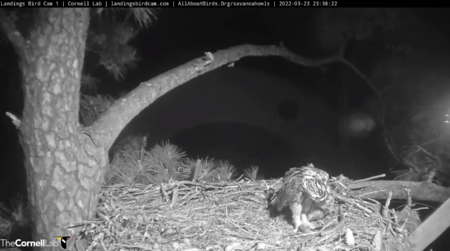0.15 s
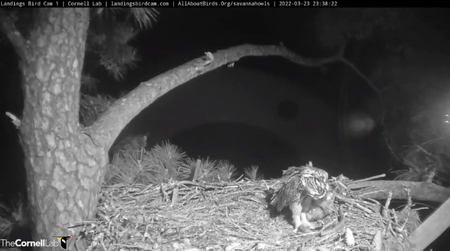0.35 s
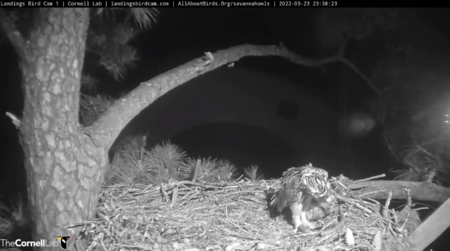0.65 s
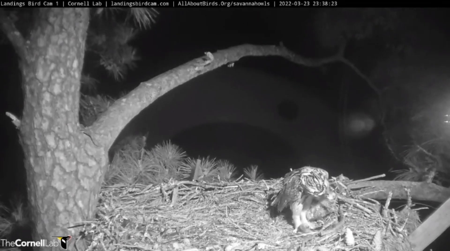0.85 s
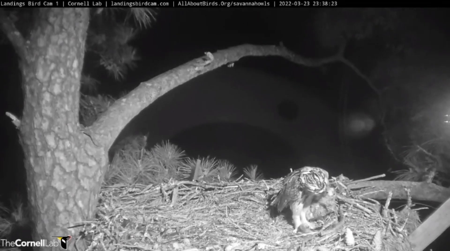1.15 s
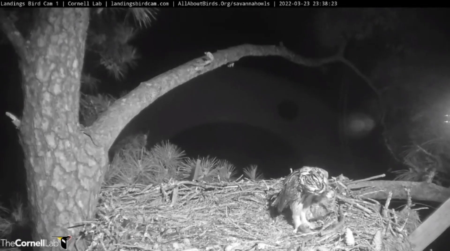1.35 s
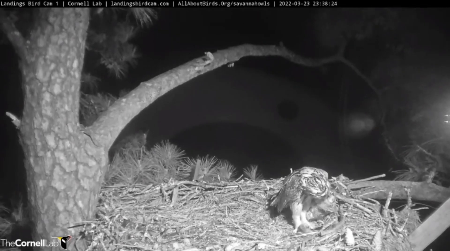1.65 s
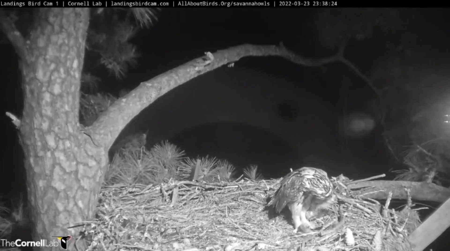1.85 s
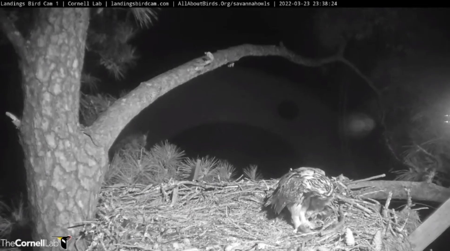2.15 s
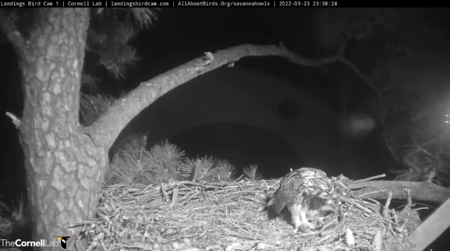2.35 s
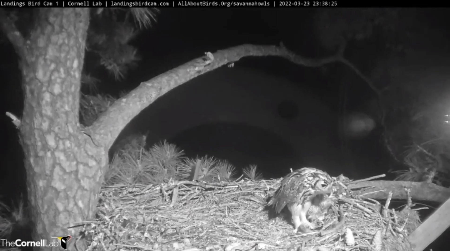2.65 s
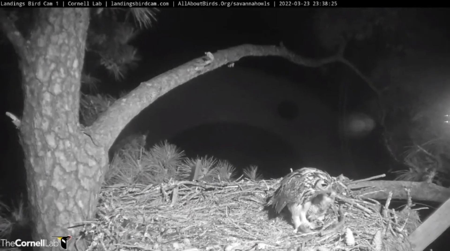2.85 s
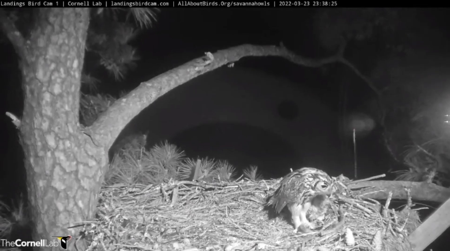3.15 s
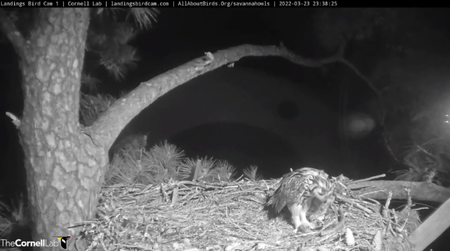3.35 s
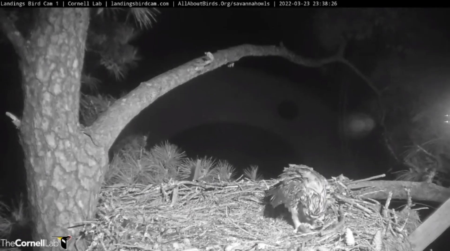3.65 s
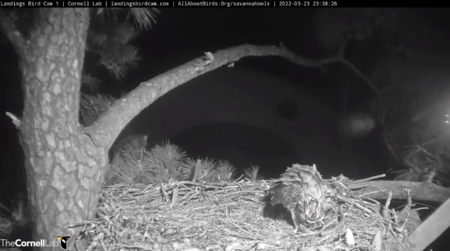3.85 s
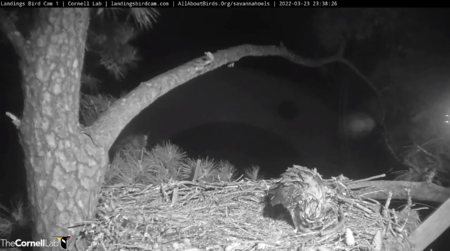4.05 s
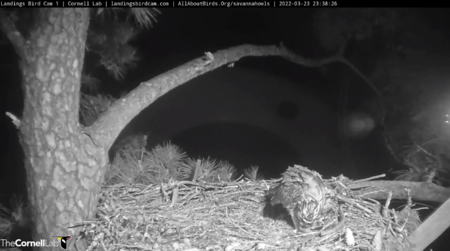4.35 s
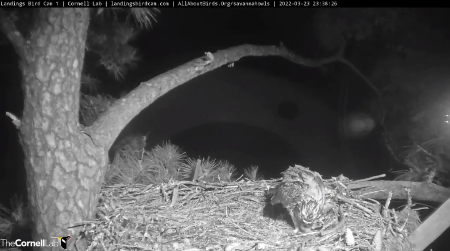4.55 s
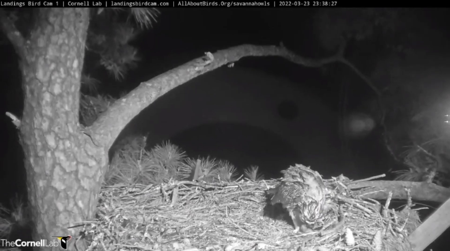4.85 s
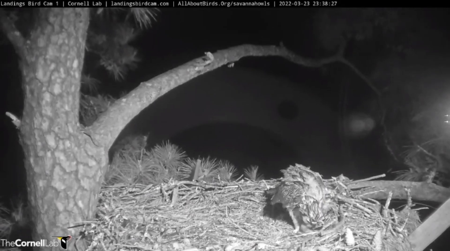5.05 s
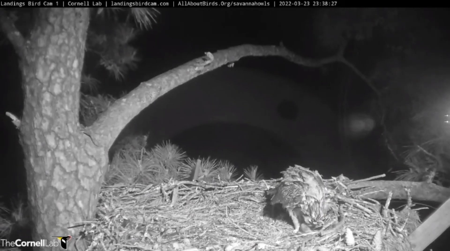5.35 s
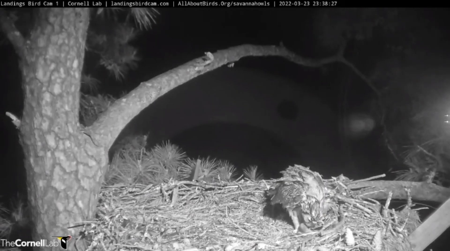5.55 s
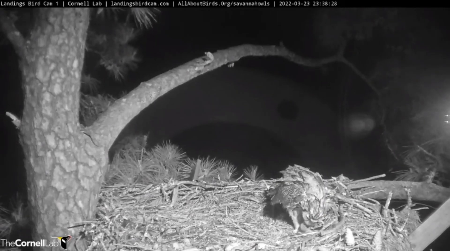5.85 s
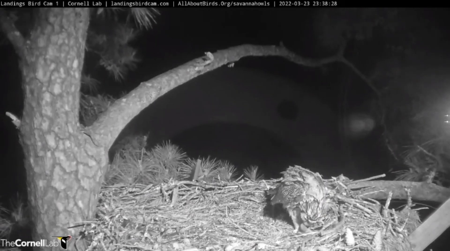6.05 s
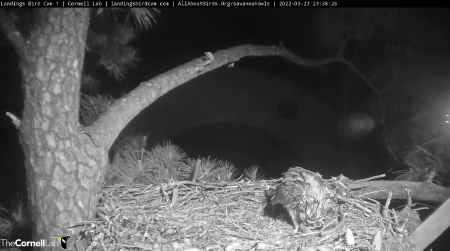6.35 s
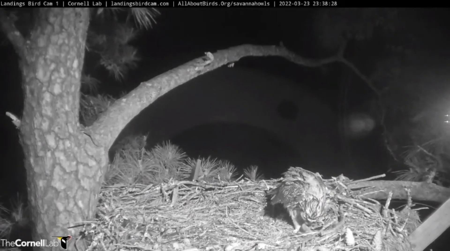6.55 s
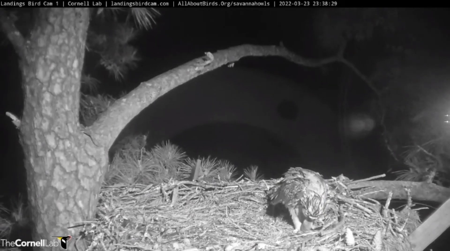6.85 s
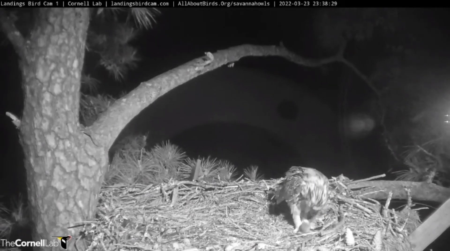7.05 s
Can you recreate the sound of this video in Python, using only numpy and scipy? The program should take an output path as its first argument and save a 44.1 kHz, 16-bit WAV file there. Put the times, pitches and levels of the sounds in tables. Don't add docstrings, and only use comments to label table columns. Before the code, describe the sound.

A microphone beside a tree nest picks up constant deep, uneven wind rumble with dull buffeting gusts. Behind it, a far night hiss and high steady whine pump up and down, with two very faint distant peeps early on. Light twig clicks are scattered throughout. Midway, one young owl utters a short, rough, piercing whistle that ends in a quick downward slide; afterwards only wind, hiss and sharper ticks remain.

```python
import sys
import numpy as np
from scipy import signal
from scipy.fft import rfft, irfft
from scipy.io import wavfile
from scipy.ndimage import uniform_filter1d

SR = 44100
rng = np.random.default_rng(int(sys.argv[2]) if len(sys.argv) > 2 else 0)


def master_out(mix):
    frames = np.transpose(np.atleast_2d(mix))
    ceiling = np.clip(frames, -1, 1)
    pcm = np.round(ceiling * 32767).astype(np.int16)
    wavfile.write(sys.argv[1], SR, pcm)


def gain_from_db(level_db):
    decades = np.asarray(level_db, float) / 20
    return 10 ** decades


N = 317520

# t/s, pressure level/dB, share of large slow eddies/dB,
# turbulence level between gusts/dB
WIND_COURSE = [(0, -38, -8, -54.5), (.3, -35, -17.5, -54), (.6, -34.5, -14, -49.5), (1.45, -34, -14, -51),
               (1.77, -40, -6.5, -56.5), (1.97, -34.5, -9, -54.5), (2.1, -38.5, -5, -56),
               (2.58, -39, -5, -61), (2.91, -48.5, -4, -57.5), (2.98, -37, 0, -56.5),
               (3.12, -40, -2.5, -59.5), (3.3, -36, -8.5, -55), (3.9, -38, -11.5, -56.5),
               (4.45, -35.5, -7, -55.5), (4.75, -37, 0.5, -52), (5.0, -35, -6, -51.5),
               (5.8, -35.5, -3, -52), (7.2, -38.5, -5, -60.5)]
# middle t/s, length/s, strength/dB, whistle over the housing/dB
GUSTS = [(0.39, 0.091, 6.5, 6), (.62, 0.3, 1, 1), (0.8, 0.39, 0, 2.5), (1.09, 0.19, 4.5, 7),
         (1.365, .11, -0.5, 6), (1.567, 0.11, 4.5, 3.5), (1.898, 0.21, 5.5, 4.5), (2.22, 0.19, 6.5, 4.5),
         (2.469, 0.072, 6.5, -0.5), (2.568, 0.03, 12, -6), (3.003, 0.096, 9, 4.5), (3.267, 0.18, 6, 6),
         (3.415, 0.12, 6.5, 7), (3.597, 0.056, 11.5, 8), (3.705, 0.16, 8, 5.5), (3.962, 0.054, 1, 4),
         (4.122, 0.12, 4.5, 6), (4.36, 0.41, 4.5, 3), (4.678, 0.047, 1.5, 5), (4.906, 0.13, 0.5, 3),
         (5.246, 0.12, 0.5, 2.5), (5.515, 0.33, 1, 1), (5.8, 0.29, 3, 1.5), (5.98, 0.11, -1.5, -1),
         (6.308, 0.27, 4, 2.5), (6.494, 0.04, 5, 5), (6.829, 0.11, 5, 5.5), (6.929, 0.069, 10.5, 5),
         (7.159, 0.2, 4.5, 6.5)]
# f/Hz, density/dB per Hz
RUMBLE_SPECTRUM = [(12, -67), (20, -40), (83, -0.5), (107, 3.5), (137, 0.5), (199, -19), (260, -24.5),
                   (340, -43.5), (570, -120)]
# f/Hz, density/dB per Hz
BUFFET_SPECTRUM = [(110, -25), (180, -2.5), (200, -4), (275, -2.5), (486, -15.5), (850, -18), (1250, -32.5),
                   (1800, -35)]
# t/s, far level after it/dB, level it may climb back to/dB
GAIN_CLAMPS = [(0, -70.5, -59), (.416, -69, -65), (.56, -68.5, -62.5), (.735, -68, -65),
               (1.336, -66.5, -63.5), (1.541, -65, -58.5), (1.864, -60, -58.5), (1.942, -68, -62.5),
               (2.224, -65, -62), (2.5, -65, -59), (2.76, -59, -58.5), (3.245, -65.5, -63),
               (3.456, -66.5, -64), (3.76, -69, -69), (4.066, -71.5, -63), (4.447, -65, -62),
               (4.683, -64, -55), (4.93, -64, -61.5), (5.3, -65.5, -62.5), (5.83, -65.5, -57.5),
               (6.195, -60.5, -56), (6.333, -64, -57.5), (6.92, -52, -60), (7.0, -60.5, -56.5)]
# f/Hz, density/dB per Hz
HISS_SPECTRUM = [(1300, -12), (1750, -14.5), (2300, -11), (2550, -7.5), (2800, -3), (3200, -1), (3700, -5),
                 (4300, -8), (4850, -6), (5400, -11.5), (6400, -13.5), (7000, -16.5), (7600, -29.5),
                 (8200, -46)]
# f/Hz, level above the hiss/dB
WHINE_LINES = [
    (2360, -15),
    (2832, -6.5),
    (3305, -16),
]
# t/s, length/s, f/Hz, level/dB
FAR_PEEPS = [
    (.245, .135, 2900, -62),
    (2.125, .11, 2905, -60),
]
# t/s, peak level/dB, f/Hz, bandwidth/Hz
TWIG_TICKS = [(.798, -52, 3500, 2480), (0.866, -44.5, 2930, 2000), (1.045, -53, 5200, 2030),
              (1.316, -45, 4600, 1500), (1.777, -44, 3500, 1970), (2.752, -55, 3200, 900),
              (3.317, -48.5, 4000, 2000), (3.436, -41, 3970, 2200), (3.5, -52, 4000, 3000),
              (3.619, -44, 5770, 3500), (3.751, -49, 5600, 2500), (3.975, -60, 6770, 1770),
              (4.25, -49.5, 4380, 1497), (4.893, -40, 3350, 2500), (6.311, -34, 2880, 1390),
              (6.311, -52.5, 5470, 2600), (6.86, -43, 5030, 1500), (7.1, -46.5, 4500, 2000),
              (7.17, -42, 3480, 1200)]
# t/s, f/Hz, level/dB
MAIN_VOICE = [
    (3.67, 1900, -68),
    (3.704, 3110, -44.5),
    (3.729, 3340, -50),
    (3.755, 3040, -47.5),
    (3.89, 3070, -44.5),
    (4.019, 3010, -48),
    (4.045, 2660, -53),
    (4.067, 1880, -61),
    (4.085, 1605, -80),
]
# t/s, f/Hz, level/dB
SECOND_VOICE = [
    (3.695, 3200, -62),
    (3.712, 3710, -50),
    (3.79, 3640, -50.5),
    (3.9, 3470, -50.5),
    (4.015, 3230, -53),
    (4.03, 3120, -64),
]
# t/s, level/dB
UPPER_VOICE = [
    (3.74, -66),
    (3.77, -54),
    (3.85, -51),
    (4.04, -57),
    (4.065, -70),
]
# t/s, pitch step/Hz, level step/dB
BREATH_PUSHES = [
    (3.796, 86, 2.4),
    (3.874, 101, 0.99),
]


def rms_one(x):
    return x / np.sqrt(np.mean(x ** 2) + 1e-20)


def in_time(rows):
    s, *columns = np.transpose(rows)
    return [np.interp(np.arange(N) / SR, s, c) for c in columns]


def drift(rate_hz):
    r = np.exp(-20 * np.pi * rate_hz / SR)
    noise = rng.standard_normal(N // 10 + 4002)
    slow = signal.lfilter([1], [1, -2 * r, r * r], noise)[4000:]
    return np.interp(np.arange(N) / 10, np.arange(len(slow)), rms_one(slow))


def coloured(spectrum):
    hz, level_db = np.transpose(spectrum)
    octave = np.log2(np.arange(N // 2 + 1) * SR / N + 1)
    below = np.maximum(np.log2(hz[0]) - octave, 0)
    above = np.maximum(octave - np.log2(hz[-1]), 0)
    shape = gain_from_db(np.interp(octave, np.log2(hz), level_db) - 120 * (below + above))
    return rms_one(irfft(rfft(rng.standard_normal(N)) * shape, N))


def resonance(x, hz, width_hz):
    r = np.exp(-np.pi * width_hz / SR)
    zeros = (1 - r * r) / 2 * np.array([1, 0, -1])
    poles = [1, -2 * r * np.cos(2 * np.pi * hz / SR), r * r]
    return signal.lfilter(zeros, poles, x)


def window(start, stop, fade):
    return np.interp(np.arange(N) / SR, [start, start + fade, stop - fade, stop], [0, 1, 1, 0])


def bump(centre, length):
    return np.maximum(1 - 2 * np.abs(np.arange(N) / SR - centre) / length, 0)


def wind_levels():
    calm_db, ring_below_db, ring_follows, gust_push = -54.5, -9, 0.68, 0.26
    pressure_db, share_db, turbulence_db = in_time(WIND_COURSE)
    gust_db, whistle_db = np.zeros((2, N))
    for s, length, strength_db, over_housing_db in GUSTS:
        blunt = np.minimum(1.8 * bump(s, length), 1)
        gust_db += strength_db * blunt
        whistle_db += over_housing_db * blunt
    share = np.clip(gain_from_db(2 * (share_db + 0.5 * drift(2.7))), .01, .85)
    rumble_db = pressure_db + gust_push * gust_db + 10 * np.log10(1 - share)
    deep_db = 10 * np.log10(share / (1 - share))
    ring_db = calm_db + ring_below_db + ring_follows * (turbulence_db - calm_db) + whistle_db
    return rumble_db, deep_db, turbulence_db + gust_db, ring_db


def wind():
    squeeze, split_hz, eddy_db = 0.37, 95, 2.0
    ring_hz, ring_width_hz = 1010, 150
    rumble_db, deep_db, buffet_db, ring_db = wind_levels()
    air = coloured(RUMBLE_SPECTRUM)
    air = air / np.sqrt(uniform_filter1d(air ** 2, size=600) + 0.04) ** squeeze
    low_pass = signal.butter(2, split_hz, "low", fs=SR, output="sos")
    high_pass = signal.butter(2, split_hz, "high", fs=SR, output="sos")
    deep = rms_one(signal.sosfiltfilt(low_pass, air))
    throb = rms_one(signal.sosfiltfilt(high_pass, air))
    rumble = gain_from_db(rumble_db - 1.96) * (throb + gain_from_db(deep_db) * deep)

    eddies = drift(45)
    buffet = rms_one(coloured(BUFFET_SPECTRUM) * gain_from_db(eddy_db * eddies))
    shaken = rng.standard_normal(N) * gain_from_db(eddy_db * (1.1 * eddies + 0.28 * drift(30)))
    ring = resonance(shaken, ring_hz, ring_width_hz)
    ring = rms_one(resonance(ring, ring_hz, 1.6 * ring_width_hz))
    return rumble + gain_from_db(buffet_db) * buffet + gain_from_db(ring_db) * ring


def gain_control():
    recover_db_per_s, clamp_s = 26, .025
    s, low_db, top_db = np.transpose(GAIN_CLAMPS)
    t = np.arange(N) / SR
    last = np.maximum(np.searchsorted(s, t, "right") - 1, 0)
    level_db = np.minimum(low_db[last] + recover_db_per_s * (t - s[last]), top_db[last])
    return uniform_filter1d(level_db, size=int(clamp_s * SR), mode="nearest")


def electrical_whine():
    cycles_per_hz = np.cumsum(1 + .0005 * drift(4)) / SR
    whine = np.zeros(N)
    for hz, db in WHINE_LINES:
        whine += gain_from_db(db + drift(13)) * np.sqrt(2) * np.sin(2 * np.pi * hz * cycles_per_hz)
    return whine


def hollow_band():
    hollow = rng.standard_normal(N)
    for stage in range(3):
        hollow = resonance(hollow, 2043, 404)
    return gain_from_db(-6 + 1.06 * drift(4.6) + 2.0) * rms_one(hollow)


def peep(start, length, hz, level_db):
    swell = window(start, start + length, .2 * length)
    phase = 2 * np.pi * np.cumsum(hz * (.99 + .01 * swell)) / SR
    return gain_from_db(level_db) * swell * np.sin(phase)


def night():
    far = gain_from_db(0.5) * coloured(HISS_SPECTRUM) + hollow_band() + electrical_whine()
    peeps = sum(peep(*row) for row in FAR_PEEPS)
    return gain_from_db(gain_control() + 1.17 * drift(54)) * far + peeps


def twigs():
    decay_s, length = 0.0015, 400
    out = np.zeros(N)
    decay = np.exp(-np.arange(length) / (decay_s * SR))
    for s, peak_db, hz, width_hz in TWIG_TICKS:
        burst = rng.standard_normal(length) * decay
        tick = resonance(resonance(burst, hz, width_hz), hz, width_hz)
        at = round(s * SR)
        out[at:at + length] += gain_from_db(peak_db) * tick / np.abs(tick).max()
    return out


def breath_pushes():
    rise_s = 0.011
    t = np.arange(N) / SR
    step_hz, step_db = np.zeros((2, N))
    for s, hz, db in BREATH_PUSHES:
        rise = np.clip((t - s) / rise_s + .5, 0, 1)
        step_hz += hz * rise
        step_db += db * rise
    return step_hz, step_db


def membrane(hz, rows, jitter, shimmer_db):
    level_db = in_time(rows)[-1]
    phase = 2 * np.pi * np.cumsum(hz * (1 + jitter * drift(220))) / SR
    gate = window(rows[0][0], rows[-1][0], .006)
    return phase, np.sqrt(2) * gate * gain_from_db(level_db + shimmer_db * drift(250))


def rasp(phase, spread_hz):
    low_pass = signal.butter(3, spread_hz, fs=SR, output="sos")
    flutter = signal.sosfilt(low_pass, rng.standard_normal((2, N)))
    return rms_one(flutter[0] * np.sin(phase) + flutter[1] * np.cos(phase))


def owlet():
    step_hz, step_db = breath_pushes()
    pitch_hz = in_time(MAIN_VOICE)[0] + step_hz
    second_hz = in_time(SECOND_VOICE)[0] + 1.5 * step_hz
    held = np.clip(pitch_hz / 200 - 14.4, 0, 1)
    main, height = membrane(pitch_hz, MAIN_VOICE, jitter=.012, shimmer_db=2.0)
    height = height * gain_from_db(step_db - 8 * bump(3.715, 0.016))
    second, second_height = membrane(second_hz, SECOND_VOICE, jitter=.013, shimmer_db=2.3)
    upper, upper_height = membrane(pitch_hz + 1030, UPPER_VOICE, jitter=.014, shimmer_db=2.6)
    upper_height = upper_height * gain_from_db(-4)
    lines = height * np.sin(main) + second_height * np.sin(second) + upper_height * np.sin(upper)

    effort = uniform_filter1d(height, size=600)
    hoarse = effort * (gain_from_db(-18.0) * rasp(1.06 * main, 300) + gain_from_db(-21.5) * rasp(.8 * main, 600))
    hoarse += gain_from_db(-9) * second_height * rasp(second, 250)
    hoarse += gain_from_db(-8) * upper_height * rasp(1.03 * upper, 300)

    strain = np.abs(effort / effort.max()) ** 1.3
    overtone = gain_from_db(-22) * height * strain * held * (np.sin(2 * main) + 0.36 * rasp(2 * main, 200))

    sums = second_height * rasp(main + second, 160)
    sums += gain_from_db(9) * upper_height * rasp(main + 1.07 * upper, 300)
    sums *= gain_from_db(-27) * held

    crown = gain_from_db(-29) * effort * held * rasp(1.45 * main, 250)
    crown += gain_from_db(-52) * effort * held * rasp(2.2 * main, 900)
    return lines + hoarse + overtone + sums + crown


def scene():
    return (wind() + night() + twigs() + owlet())[None]


def top_cut(x):
    return signal.sosfilt(signal.butter(12, 15750, fs=SR, output="sos"), x)


def record(dry):
    link = signal.butter(8, 6800, fs=SR, output="sos")
    narrow = signal.sosfilt(link, dry)
    whistle_band = signal.butter(2, [2700, 3450], "band", fs=SR, output="sos")
    treble = signal.sosfilt(whistle_band, narrow)
    bent = narrow + 30 * treble ** 3
    circuit = gain_from_db(-94) * coloured([(3000, 0), (15700, -3)])
    return top_cut(bent + circuit)


dry = scene()
out = record(dry)
master_out(out)
```